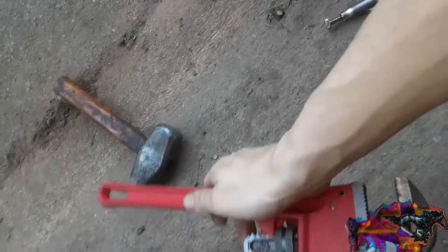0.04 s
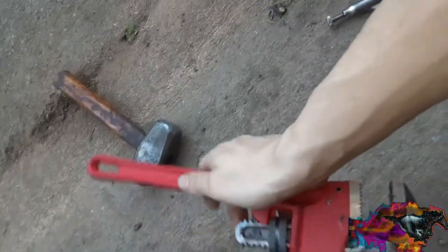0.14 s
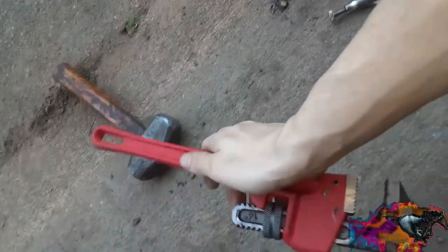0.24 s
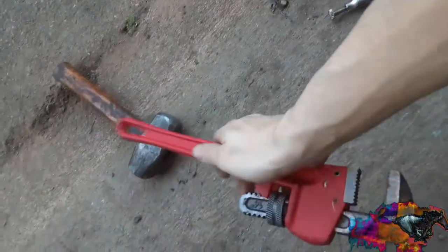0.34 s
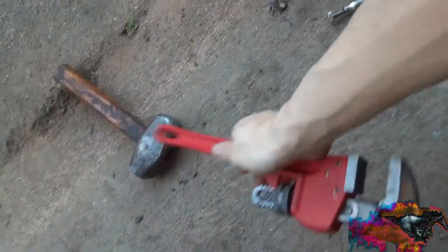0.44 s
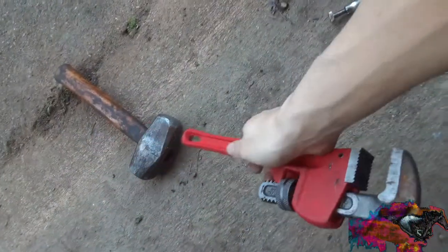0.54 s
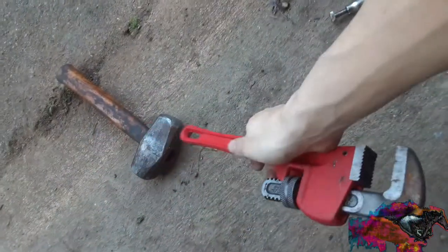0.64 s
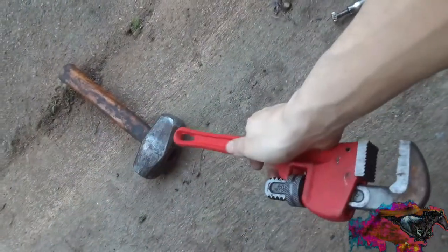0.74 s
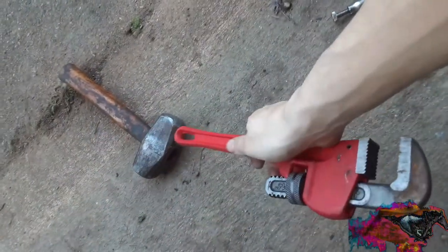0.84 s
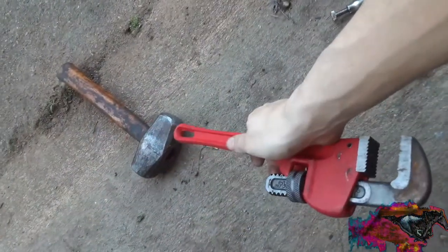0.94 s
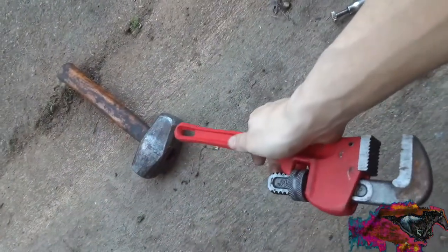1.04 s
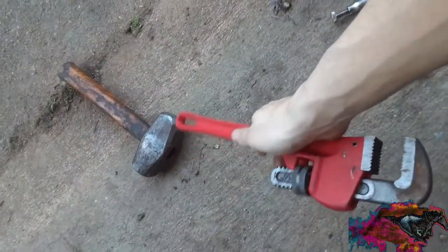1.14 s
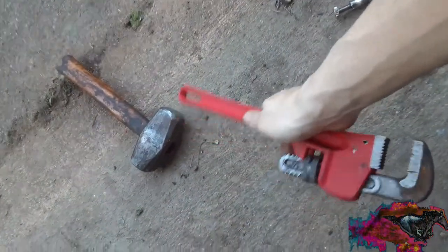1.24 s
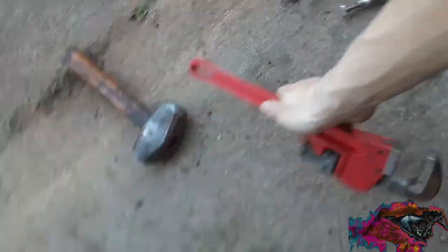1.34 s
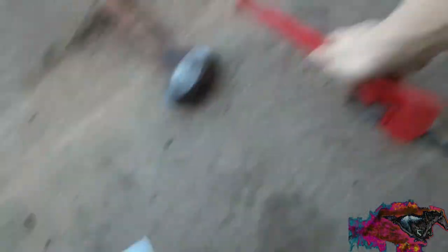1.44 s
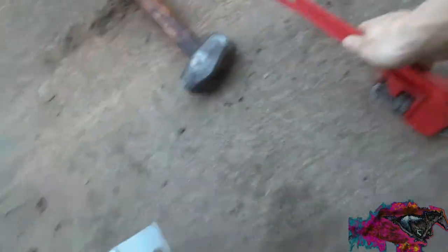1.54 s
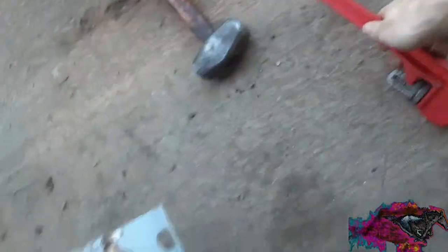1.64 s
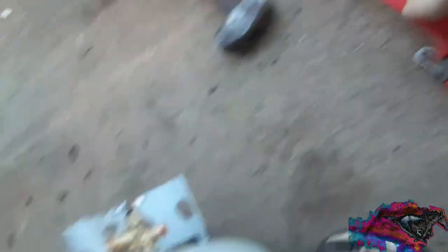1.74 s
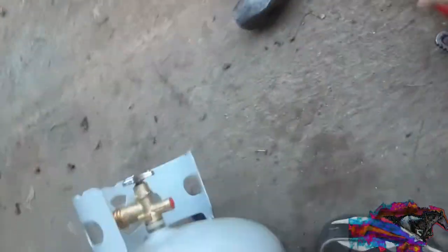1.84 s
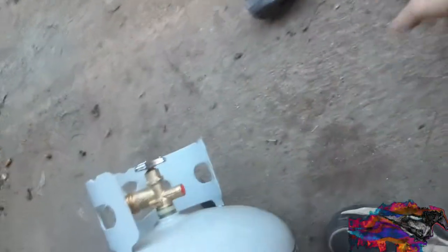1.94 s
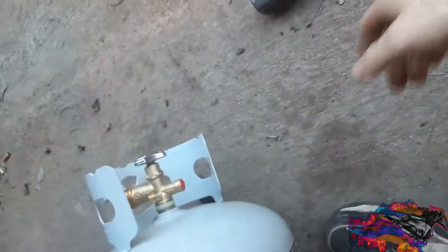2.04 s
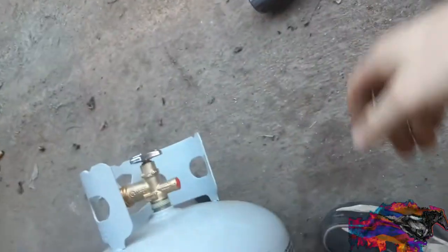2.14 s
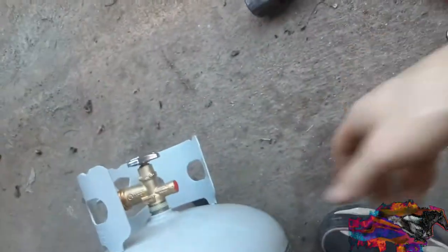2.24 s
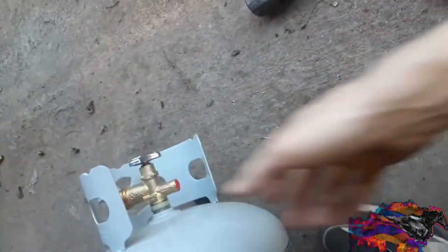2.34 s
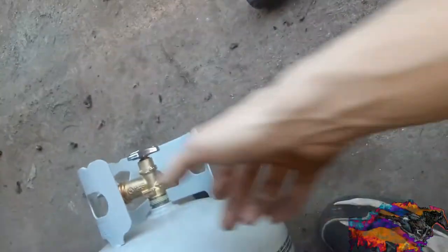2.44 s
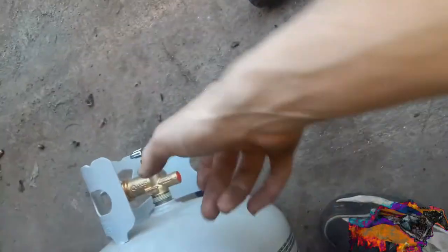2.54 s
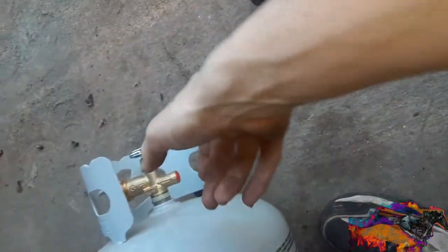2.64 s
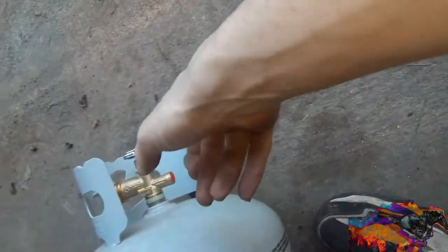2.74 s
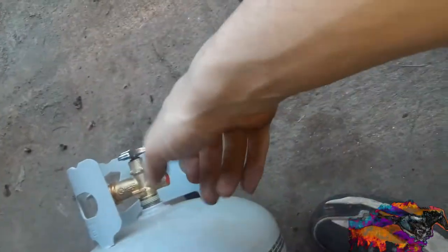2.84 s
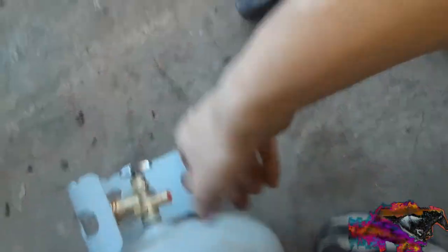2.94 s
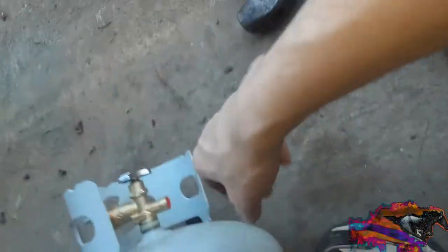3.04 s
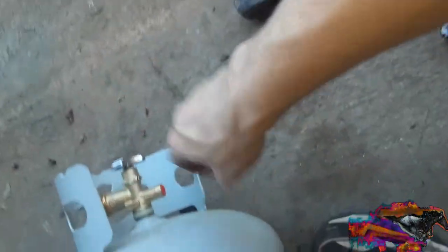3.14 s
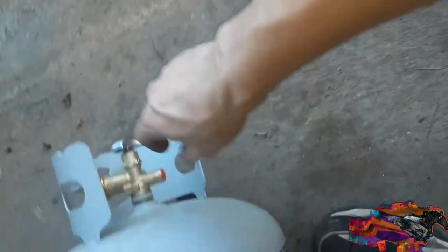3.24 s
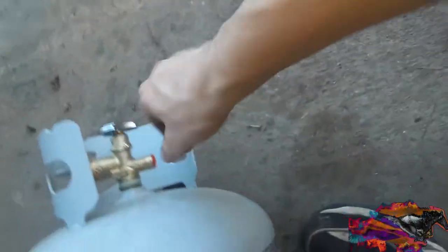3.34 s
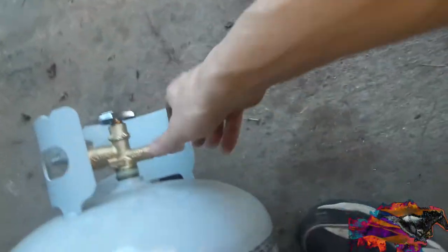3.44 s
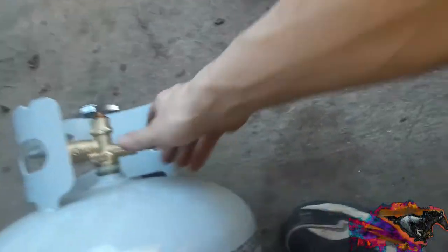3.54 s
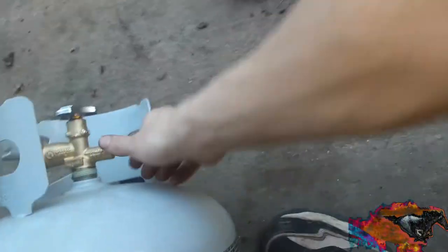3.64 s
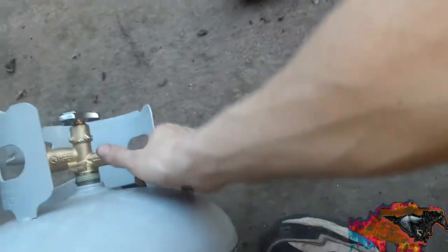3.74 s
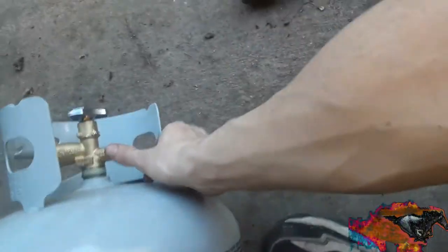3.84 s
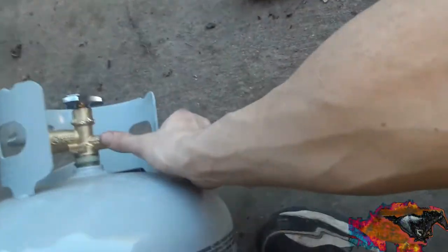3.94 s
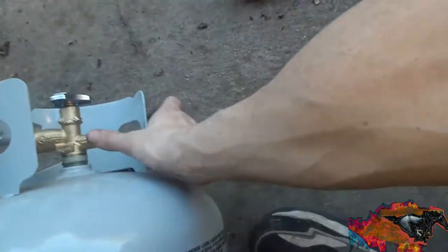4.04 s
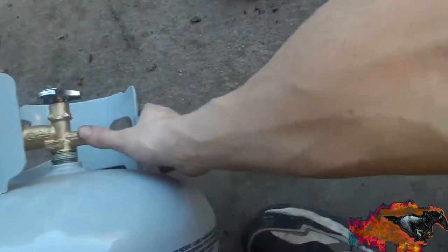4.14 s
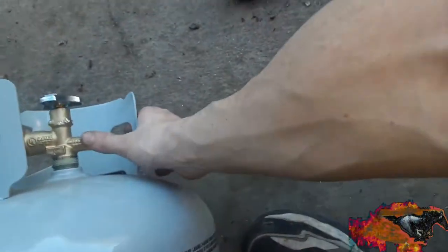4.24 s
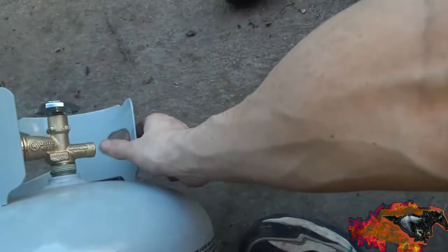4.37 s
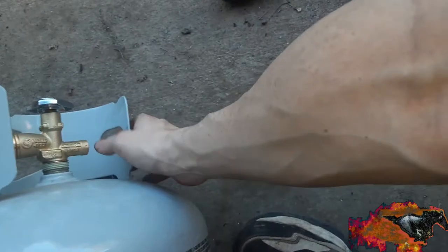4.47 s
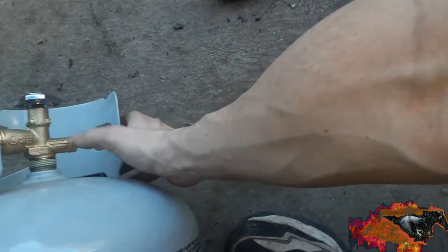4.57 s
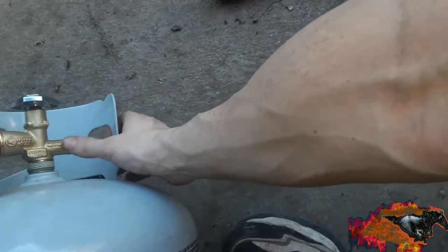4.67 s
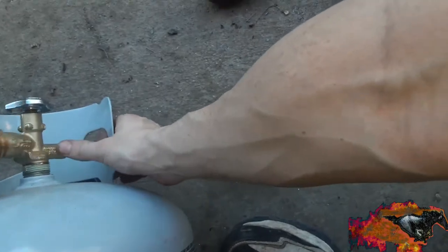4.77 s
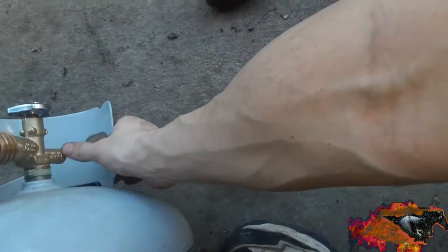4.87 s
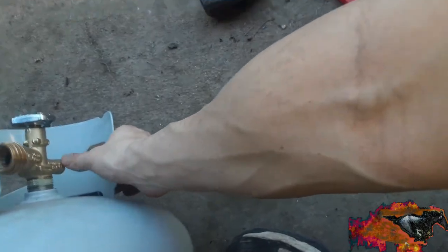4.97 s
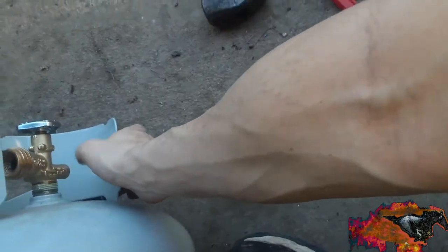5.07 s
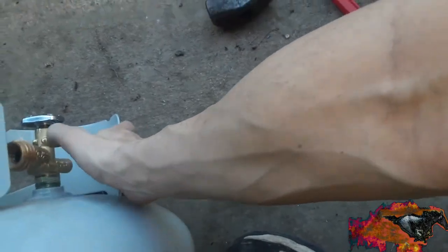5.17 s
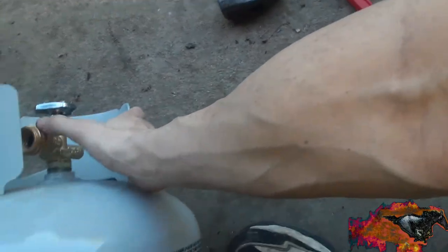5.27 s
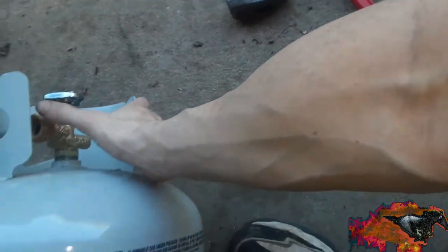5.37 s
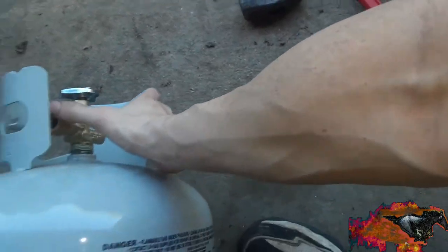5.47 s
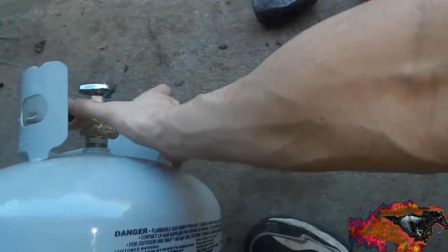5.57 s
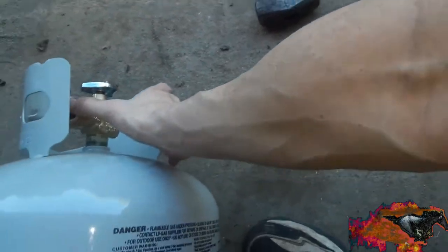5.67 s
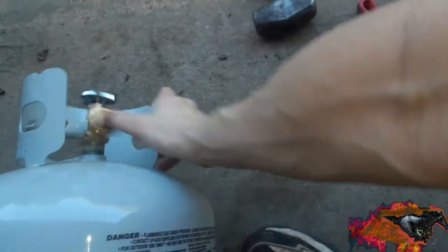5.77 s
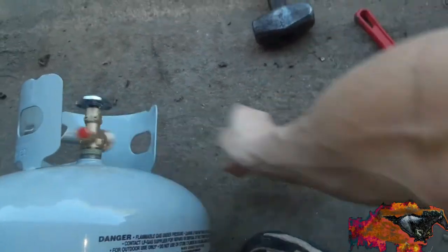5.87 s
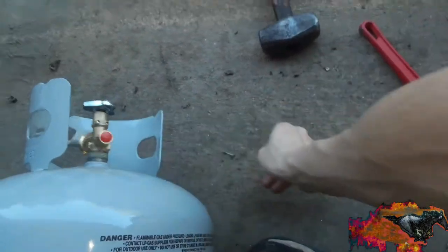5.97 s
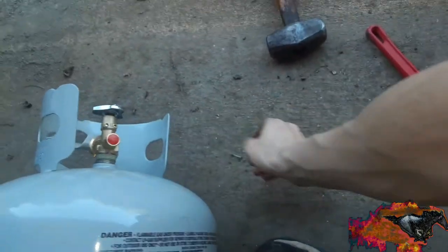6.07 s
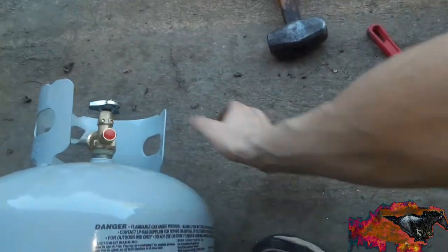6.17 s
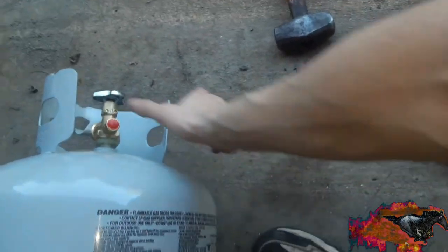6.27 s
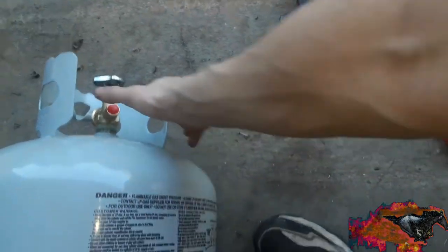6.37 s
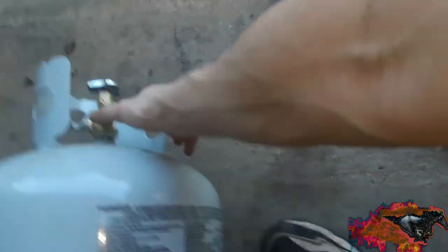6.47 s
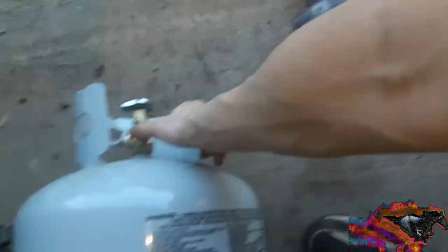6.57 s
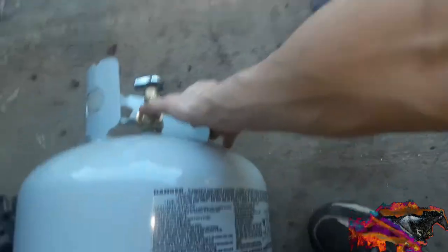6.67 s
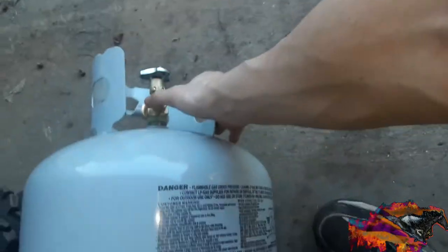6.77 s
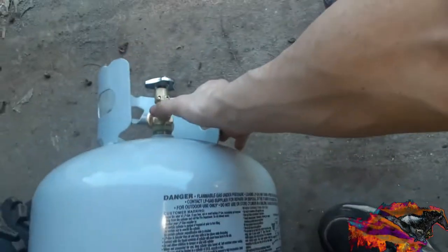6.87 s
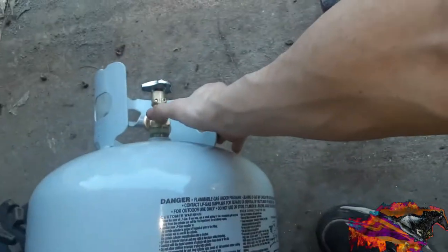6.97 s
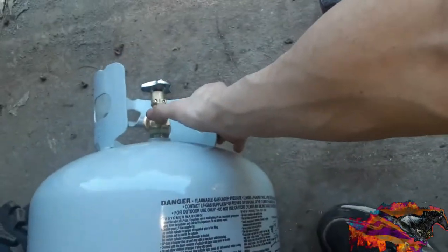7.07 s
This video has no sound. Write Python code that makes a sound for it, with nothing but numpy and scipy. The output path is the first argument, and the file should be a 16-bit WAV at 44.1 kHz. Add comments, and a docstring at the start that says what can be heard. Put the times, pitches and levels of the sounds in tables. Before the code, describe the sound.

A heavy steel wrench clanks and clatters down on concrete outdoors, then a hand lightly taps and scrapes a hollow metal gas tank.

```python
"""Outdoors throughout: distant rumble with machine hum on the left (noise bands, wavering sines) and a faint,
nearly regular ticking, probably an insect (paired resonances). From 1.3 s small ticks (snap plus sine);
at 1.4 s a steel pipe wrench is laid on concrete and clatters to rest (damped modes, knocks, short dead bumps).
From 2.8 s a hand moves about: rustle (bright noise), and a thin high whistle (gliding sine) from 3 s.
From 3.5 s the hand taps, drags and tilts a thin steel gas tank (friction bursts into clear and dense modes)."""
import sys
import numpy as np
from scipy import signal
from scipy.fft import rfft, irfft
from scipy.io import wavfile

SR = 44100
rng = np.random.default_rng(int(sys.argv[2]) if len(sys.argv) > 2 else 0)


def master_out(mix):
    """Clip the mix to full scale and print it as 16-bit PCM to the path in sys.argv[1]."""
    frames = np.transpose(np.atleast_2d(mix))
    ceiling = np.clip(frames, -1, 1)
    pcm = np.round(ceiling * 32767).astype(np.int16)
    wavfile.write(sys.argv[1], SR, pcm)


N = 313531
TIME = np.arange(N) / SR


def from_db(db):
    """Decibels to gain."""
    return 10 ** (np.asarray(db) / 20)


def rms_one(x):
    """Scale to unit rms."""
    return x / np.sqrt(np.mean(x ** 2) + 1e-20)


def in_time(rows):
    """Columns of a curve table, one value per sample."""
    s, *columns = np.transpose(rows)
    return [np.interp(TIME, s, column) for column in columns]


def at_hz(points, hz):
    """Read a spectrum on a log-frequency axis."""
    table_hz, values = np.transpose(points)
    return np.interp(np.log(hz), np.log(table_hz), values)


def drift(rate_hz):
    """Unit-rms random wander: noise through two equal one-poles at SR / 40, interpolated."""
    r = np.exp(-80 * np.pi * rate_hz / SR)
    white = rng.standard_normal(N // 40 + 2002)
    slow = signal.lfilter([1], [1, -2 * r, r * r], white)[2000:]   # skip the settling
    return np.interp(np.arange(N) / 40, np.arange(len(slow)), rms_one(slow))


def ring(push, hz, t60_s):
    """Two-pole resonator: a unit click sets a sine of height 1 ringing."""
    r = from_db(-60 / (t60_s * SR))
    w = 2 * np.pi * hz / SR
    return signal.lfilter([0, np.sin(w)], [1, -2 * r * np.cos(w), r * r], push + 1e-18)


def place(x, pan_db, lag_ms):
    """Two microphone ports: a level difference L-R, and the left one hears it lag_ms late."""
    half_s = lag_ms / 2000
    left = np.interp(TIME - half_s, TIME, x)
    right = np.interp(TIME + half_s, TIME, x)
    return np.array([left, right]) * from_db([[pan_db / 2], [-pan_db / 2]])


def bands(low_hz, likeness, white):
    """Third-octave bands of stereo noise, dealt in turn from two unrelated mid-side pairs."""
    edges = low_hz * 2 ** np.arange(0, np.log2(SR / 2 / low_hz), 1 / 3)
    for k, (low, high) in enumerate(zip(edges, edges[1:])):
        band = signal.butter(2, [low, high], "band", fs=SR, output="sos")
        mid, side = signal.sosfilt(band, white[k % 2])
        hz = np.sqrt(low * high)
        alike = np.clip(at_hz(likeness, hz), -1, 1)
        yield hz, np.sqrt(1 + alike) * mid + np.sqrt(1 - alike) * side * [[1], [-1]]


def surroundings():
    """Far traffic and air in flickering noise bands, a mains hum and two wavering motor lines."""
    # middle band level: t/s, level/dB
    air_curve = [(0, -56), (1.1, -54.5), (1.6, -51.5), (2.0, -58.5), (2.8, -60), (3.0, -57), (3.7, -54.5),
                 (6.3, -52.5), (7.1, -56)]
    # spectrum shape within each zone: f/Hz, level/dB
    air_spectrum = [(25, -47.5), (45, -10), (60, -4.5), (180, -11.5), (370, -15.5), (500, -20.5),
                    (1150, -18.5), (1600, -25), (2200, -22.5), (3200, -36.5), (4200, -32.5), (6500, -44),
                    (10000, -48.5), (14000, -41.5)]
    # left-right likeness: f/Hz, likeness (-1..1)
    likeness = [(60, .8), (150, .9), (600, .45), (2000, .5), (8000, .2)]
    # mean level of the lower motor line: t/s, level/dB
    motor_curve = [(0, -53.5), (.8, -51.5), (2.0, -58.5), (2.9, -70.5), (4.3, -60), (5.2, -52.5),
                   (7.1, -54.5)]
    rumble_db, hiss_db = 2, -11   # below and above the middle band, relative to it
    mains_hz, mains_mean_db, motor_mean_hz = 59.7, -53, 87.3

    (air_db,), (motor_db,) = in_time(air_curve), in_time(motor_curve)
    zone_db = air_db + np.array([[rumble_db], [0], [hiss_db]])
    zones, together = np.zeros((3, 2, N)), drift(2.5)
    for hz, noise in bands(27.99, likeness, rng.standard_normal((2, 2, N))):
        gain = from_db(at_hz(air_spectrum, hz) + .6 * together + .9 * drift(12))
        zones[np.searchsorted([300, 3000], hz)] += gain * noise
    out = sum(from_db(db) * rms_one(zone) for db, zone in zip(zone_db, zones))

    turn = 2 * np.pi * np.cumsum(motor_mean_hz + 2.1 * drift(7.5)) / SR
    out += from_db(motor_db + 2.5 * drift(6.5)) * np.sin(turn)
    out += from_db(motor_db - 1.5 + 1.5 * drift(3.9)) * np.sin(2 * turn)
    out += from_db(mains_mean_db + 2.436 * drift(3)) * np.sin(2 * np.pi * mains_hz * TIME)
    # it lies to the left: right port 10 samples late and weaker
    return np.array([out[0], np.roll(out[1], 10)]) * from_db([[1.3], [-1.3]])


def ticking():
    """An almost even click train; each click swells into a short pair of resonances."""
    # t/s, level/dB before the lift, lower pitch f/Hz
    click_curve = [(0, -49.5, 1830), (1.2, -43, 1883), (2.3, -54, 1991), (4.4, -48, 2040), (5.9, -38, 2055),
                   (6.55, -41.5, 2024), (6.8, -37.5, 2013), (7.1, -43.5, 2010)]
    # slightly wandering pace: tick number, t/s
    pace = [(0, .0385), (31, 1.872), (53, 3.161), (68, 4.0405), (92, 5.4543), (119, 7.0565)]
    lift_db, t60_s, swell_s = 2, .017, .001
    echo_s, echo_db = 0.018, -6.5   # a wall nearby answers each tick

    number, marks = np.transpose(pace)
    at = (np.interp(np.arange(number[-1] + 1), number, marks) * SR).astype(int)
    db, hz = (column[at, None] for column in in_time(click_curve))
    age = np.arange(SR // 40) / SR
    chance_db = 2.5 * rng.normal(0, 1, (len(at), 2))
    shape = from_db(db + lift_db - 60 * age / t60_s) * (1 - np.exp(-age / swell_s))
    pairs = 0
    for k, ratio in enumerate((1, 1.13)):
        pairs = pairs + from_db(chance_db[:, [k]]) * np.sin(2 * np.pi * ratio * hz * age)
    out = np.zeros(N + SR)
    out[at[:, None] + np.arange(len(age))] = shape * pairs
    out += from_db(echo_db) * np.roll(out, round(echo_s * SR))
    return place(out[:N], pan_db=7, lag_ms=-.3)


def ticks():
    """Each tick is a broad noise snap around its pitch, with a decaying sine at that pitch."""
    # grit, cloth and loose metal: t/s, ring level/dB, f/Hz, ring t60/s
    tick_list = [(1.289, -37, 5350, 0.13), (1.291, -38, 3130, 0.058), (2.815, -39.5, 3240, 0.0054),
                 (2.853, -36, 2010, .005), (2.873, -32, 1980, 0.011), (2.931, -32, 1930, 0.0099),
                 (2.958, -43, 1954, 0.034), (3.245, -50, 3340, 0.028), (3.319, -39.5, 13920, 0.0071),
                 (3.401, -43.5, 7040, 0.004), (3.5, -52.5, 3480, 0.18), (5.963, -35, 3020, 0.018)]
    out, age = np.zeros(N), np.arange(SR // 8) / SR
    for s, db, hz, t60_s in tick_list:
        around = signal.butter(1, [hz / 4, min(hz * 5, 20000)], "band", fs=SR, output="sos")
        burst = rng.standard_normal(len(age)) * from_db(-60 * age / np.clip(t60_s, .008, .03))
        snap = 0.5 * signal.sosfilt(around, burst)
        tone = np.sin(2 * np.pi * hz * age) * from_db(-60 * age / t60_s)
        out[round(s * SR):][:len(age)] += from_db(db) * (snap + tone)
    return place(out, pan_db=5.5, lag_ms=-0.21)


def wrench():
    """Each contact with the ground damps what rings, strikes every mode anew and adds a short gritty knock."""
    # contacts: t/s, strength/dB, spot (0 handle, .5 hook, 1 jaw), share of earlier ringing that survives
    contacts = [(1.4065, -9.5, 0.0039, 1), (1.4265, -19, 0.42, .25), (1.437, -39.5, 0.1, 0.17),
                (1.637, -35, 0.51, 0.83), (1.6503, -8, 0.44, 0.52), (1.66, -19, 0.61, 0.16),
                (1.696, -31, 0.56, 0.4), (1.737, -37, 0, 1), (1.7445, -18.5, 0.57, 1),
                (1.753, -9.5, 0.74, .9), (1.7665, -9, .8, .5), (1.78, -10, 0.46, 0.99),
                (1.79, -19.5, 0.91, 0.43), (1.808, -18.5, 0.81, 0.16), (1.8155, -16, 0.5, .6),
                (1.84, -38, 0.56, 0.13)]
    # edges between the handle, jaw, hook and fine modes: f/Hz
    group_edges_hz = [2500, 4500, 5700]
    # modes: f/Hz, level in its group/dB, t60/s
    modes = [(1190, -22, .35), (1588, -11, .09), (1848, -1, .22), (2960, -16, .3), (3604, -1, .36),
             (3862, -9, .3), (3889, -14, .15), (5013, -10, .25), (5070, 0, .36), (5101, -5, .3),
             (5148, -7, .15), (5232, -8, .05), (5342, -10, .2), (5500, -11, .04), (5905, -3, .09),
             (6055, -9, .13), (6803, 0, .14), (8630, -9, .08), (9795, -6, .11), (11090, -4, .07),
             (14160, 0, .1)]
    # f/Hz, L-R level/dB
    pan = [(1900, -5), (3700, -0.5), (5100, -2), (13000, -2)]
    # f/Hz, delay of the left port/ms
    lag = [(1900, 0.2), (5100, .2)]
    # what a blow feeds: spot (0-1), handle/dB, jaw/dB, hook/dB, fine modes/dB, knock/dB
    spot_feeds = [(0, 0.5, -27.5, -25, -38.5, -17.5), (0.501, -5, -6, 2, -12, -16),
                  (1, -21.5, 8, -7, -16.5, -18.5)]
    contact_s, damping_s, knock_t60_s = 0.00032, 0.0012, 0.089

    hits, (hz, mode_db, t60_s) = np.array(contacts), np.transpose(modes)[:, :, None]
    group = np.searchsorted(group_edges_hz, hz[:, 0])
    out, span = np.zeros((2, N)), SR // 2
    age, chance_db = np.arange(span) / SR, rng.normal(0, 1.5, (len(hits), len(hz)))
    sides = from_db(np.outer([.5, -.5], at_hz(pan, hz[:, 0])))
    late_s = np.outer([1, 0], at_hz(lag, hz[:, 0]) / 1000)
    grit = signal.butter(2, [250, 9000], "band", fs=SR, output="sos")
    flutter = from_db(1.3 * drift(190))   # a fast random flutter of level roughens the ringing
    spots, *feeds = np.transpose(spot_feeds)
    for k, (s, db, spot, kept) in enumerate(hits):
        start = round(s * SR)
        drive_db = np.array([db + np.interp(spot, spots, feed) for feed in feeds])
        left = 1 - np.exp(-age / contact_s)   # the contact takes a moment
        for later, share in hits[k + 1:, [0, -1]]:
            left *= 1 - (1 - np.clip(share, 0, 1)) * np.clip((age - later + s) / damping_s, 0, 1)
        height = from_db(mode_db + (drive_db[group] + chance_db[k])[:, None] - 60 * age / t60_s)
        # each strike starts its modes at random phases, in radians
        turn = np.outer([1, 0], rng.normal(0, 1.2e-4, len(hz)) * hz[:, 0])
        turn = turn + rng.normal(0, 1, len(hz))
        rings = 0
        for m in range(len(hz)):
            phase = 2 * np.pi * hz[m] * (age - late_s[:, [m]]) + turn[:, [m]]
            rings = rings + height[m] * np.sin(phase) * sides[:, [m]]
        burst = from_db(drive_db[-1] - 60 * age / knock_t60_s) * rng.standard_normal(span)
        knock = signal.sosfilt(grit, burst)
        out[:, start:][:, :span] += left * flutter[start:][:span] * rings + knock
    # scatter from ground and walls nearby, t60 0.2 s
    scatter = rng.standard_normal((2, SR // 5)) * from_db(-40 - 60 * np.arange(SR // 5) / SR / .2)
    return out + signal.oaconvolve(out, scatter, axes=1)[:, :N]


def bumps():
    """Dead knocks: a sine that swells in about a cycle and falls 60 dB in 21 cycles."""
    # wrench body and tank foot on the ground: t/s, level/dB, f/Hz
    bump_list = [(1.4068, -11.5, 1150), (1.736, -27, 700), (1.752, -9, 4000), (1.768, -6, 2752),
                 (1.8167, -23.5, 3000), (5.361, -33.5, 216), (5.709, -32, 184), (6.29, -36, 990),
                 (6.319, -24, 265)]
    out, age = np.zeros(N), np.arange(SR // 5) / SR
    for s, db, hz in bump_list:
        cycles = age * hz
        shape = from_db(db - 60 * cycles / 21.0) * (1 - np.exp(-cycles / 1.2))
        out[round(s * SR):][:len(age)] += shape * np.sin(2 * np.pi * cycles)
    return out


def rustle():
    """Clumped bright noise that rises fast and fades, while the hand moves about."""
    # t/s, length/s, level before the high-pass/dB
    rustles = [(2.807, 0.36, -61), (3.102, 1, -67.5), (3.847, 0.31, -65.5), (4.624, 0.22, -66.5)]
    level = np.zeros(N)
    for s, length_s, db in rustles:
        rise = np.clip((TIME - s) / 0.023, 0, 1)
        fade = np.clip((s + length_s - TIME) / (.5 * length_s), 0, 1)
        level += from_db(db) * rise * fade
    high_pass = signal.butter(1, 3000, "high", fs=SR, output="sos")
    bright = signal.sosfilt(high_pass, rng.standard_normal((2, N)))
    return level * from_db(2.2 * drift(17)) * bright


def whistle():
    """A gliding sine of wavering level that fades in and out."""
    # t/s, f/Hz, mean rms level/dB
    glide = [(3.0, 11950, -78), (3.069, 12100, -78), (3.11, 12400, -73.5), (3.19, 11530, -88)]
    hz, db = in_time(glide)
    on = np.clip(np.minimum(TIME - glide[0][0], glide[-1][0] - TIME) / .02, 0, 1)
    tone = np.sin(2 * np.pi * np.cumsum(hz) / SR)
    return np.sqrt(2) * on * from_db(db + 2.5 * drift(30)) * tone


def crowded_modes(count, width_hz):
    """Noise whose spectrum is a thicket of narrow peaks, like the many small modes of a thin shell."""
    hz, peaks = np.arange(N // 2 + 1) * SR / N, np.zeros(N // 2 + 1)
    peaks[rng.integers(0, len(hz), count)] = rng.exponential(1, count)
    near_hz = hz[:2000] - hz[1000]
    resonance = 1 / (1 + (2 * near_hz / width_hz) ** 2)
    thicket = np.sqrt(.12 + signal.oaconvolve(peaks, resonance, "same"))
    return rms_one(irfft(rfft(rng.standard_normal((2, 2, N))) * thicket, N))


def tank():
    """Each touch is a friction burst as long as its contact; it feeds clear modes and the dense ones between."""
    # touched or dragged: t/s, drive level/dB, low modes relative to it/dB, contact/s
    touches = [(3.49, -54, -15, 0.051), (3.738, -34.5, -19, 0.11), (4.104, -25, 3.5, 0.0021),
               (4.24, -46, 12, 0.13), (5.103, -33.5, 0.5, 0.0099), (5.184, -38, 8.5, 0.012),
               (5.198, -39, 5.5, 0.052), (5.319, -38.5, 12, 0.11), (5.539, -47.5, -33, 0.0068),
               (5.638, -35.5, -11, 0.013), (5.669, -25, 0, 0.058), (5.989, -29.5, -4, 0.035),
               (6.011, -26, -0.5, 0.044), (6.134, -33, 5.5, 0.024), (6.165, -35.5, 7, 0.23)]
    # clear modes: f/Hz, level before the lift/dB, t60/s
    modes = [(1253, -17, .4), (1575, -7, .35), (1830, -15, .4), (1933, -11, .25), (2428, -11, .25),
             (2498, -17, 1.2), (2800, -5, .22), (2930, -10, .3), (3120, -10, .12), (3540, -8, .14),
             (4057, -10, .1), (4420, -10, .25), (4483, -8, .1), (4950, -11, .15), (7710, -14, .2),
             (10170, -17, .22), (11965, -15, .2), (14000, -20, .15)]
    # dense small modes: f/Hz, level before the lift/dB
    shell = [(700, -20), (1540, -13.5), (2080, -7.5), (3320, -5.5), (9110, -18.5), (11800, -22),
             (16000, -22.5)]
    mode_lift_db, shell_lift_db, shell_t60_s = 5.0, 9.0, 0.33
    top_modes_db, slip_db, slip_rate_hz = 11, 5.5, 130   # lift of the top modes; unevenness of a drag
    drag_loss_db_per_s = 102   # a long contact muffles the clear modes

    bursts, slips = [], from_db(slip_db * drift(slip_rate_hz))
    for s, db, low_db, contact_s in touches:
        at, size = round(s * SR), max(int(contact_s * SR), 8)
        uneven = slips[at:at + size] * np.hanning(size)
        shape = .6 * rms_one(uneven) / np.sqrt(size)
        bursts.append((at, shape, db + np.array([low_db, 0, top_modes_db])))

    def tilt(hz, dbs):
        """Drive in dB at one frequency, from its low, middle and top values."""
        return np.interp(np.log(hz), np.log([1500, 4000, 12000]), dbs)

    waver = from_db(2.5 * drift(25))   # stands for close neighbours beating against each mode
    out, grit = np.zeros((2, N)), rng.choice([-1, 1], N)
    chance_db = rng.normal(0, 2, (len(touches), len(modes)))   # every touch favours other modes
    for (hz, mode_db, t60_s), luck in zip(modes, chance_db.T):
        push = np.zeros(N)
        for (at, shape, dbs), luck_db in zip(bursts, luck):
            loss_db = drag_loss_db_per_s * len(shape) / SR
            gain_db = tilt(hz, dbs) + mode_db + mode_lift_db + luck_db - loss_db
            push[at:at + len(shape)] += shape * from_db(gain_db)
        lag_ms = rng.normal(-.27, .04)   # a slightly different random delay between the ports for each mode
        # shifted copies give each mode its own grit and waver
        rung = ring(push * np.roll(grit, int(hz)), hz, t60_s)
        out += place(np.roll(waver, int(hz) * 9) * rung, pan_db=3, lag_ms=lag_ms)

    leak = from_db(-120 / (shell_t60_s * SR))   # stored energy leaks away
    likeness = [(1000, 0.38), (12000, 0.081)]   # f/Hz, left-right likeness
    for hz, noise in bands(965, likeness, crowded_modes(count=300, width_hz=10)):
        power = np.zeros(N)
        for at, shape, dbs in bursts:
            power[at:at + len(shape)] += (shape * from_db(tilt(hz, dbs))) ** 2
        level = np.sqrt(signal.lfilter([1], [1, -leak], power + 1e-24))
        out += from_db(at_hz(shell, hz) + shell_lift_db) * level * noise
    return out


def scene():
    """All sources together."""
    return surroundings() + ticking() + ticks() + wrench() + bumps() + rustle() + whistle() + tank()


def record(dry):
    """The microphone drops the deepest bass, the loudest peaks are rounded and the top is cut steeply."""
    high_pass = signal.butter(2, 45, "high", fs=SR, output="sos")
    rounded = np.tanh(signal.sosfilt(high_pass, dry))
    low_pass = signal.ellip(10, .5, 80, 16000, fs=SR, output="sos")   # ripple/dB, stop/dB, cutoff/Hz
    return signal.sosfilt(low_pass, rounded)


dry = scene()
out = record(dry)
master_out(out)
```